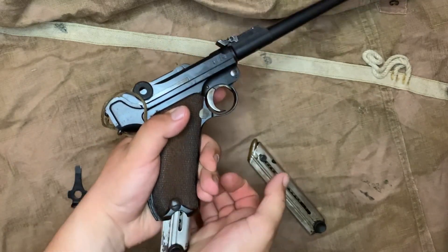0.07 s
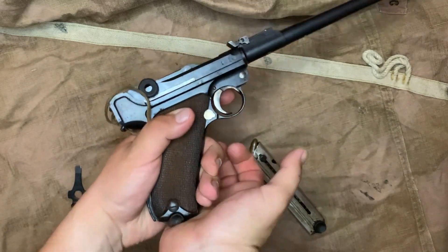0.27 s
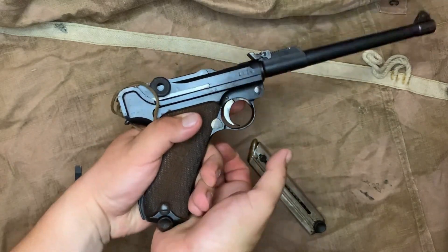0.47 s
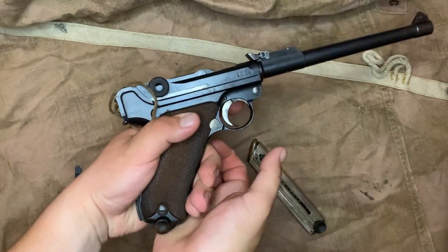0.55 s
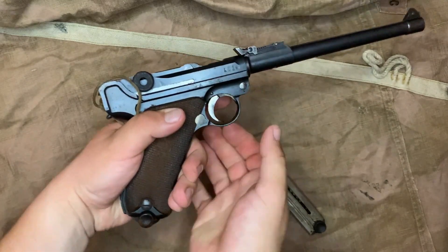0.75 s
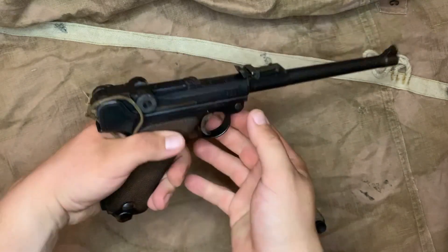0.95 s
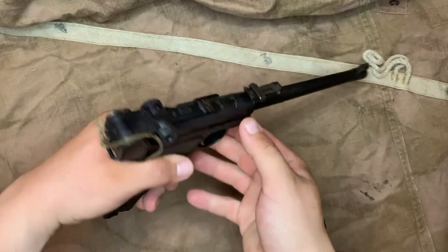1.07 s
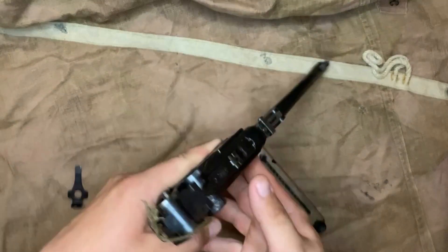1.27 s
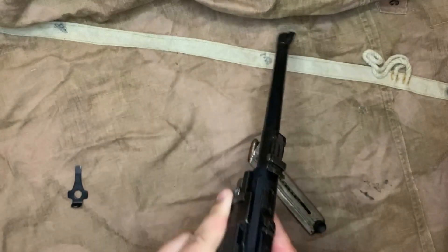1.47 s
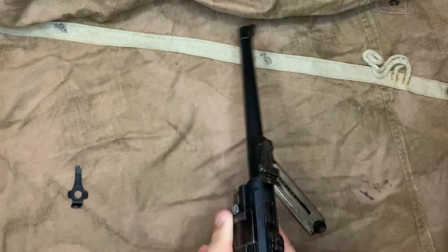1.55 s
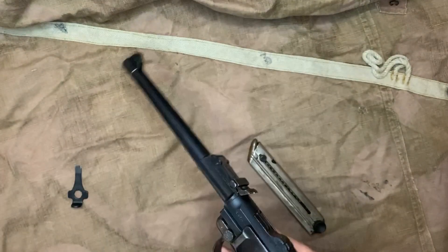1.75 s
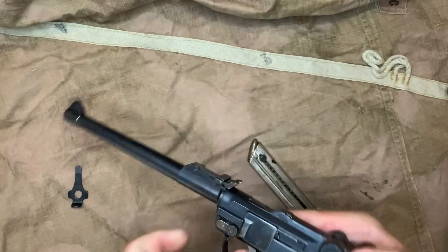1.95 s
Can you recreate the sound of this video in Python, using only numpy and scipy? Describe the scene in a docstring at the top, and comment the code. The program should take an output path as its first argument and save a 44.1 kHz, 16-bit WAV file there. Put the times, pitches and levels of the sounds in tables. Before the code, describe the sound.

A pistol magazine latches with a sharp metal clack, then a click and soft handling.

```python
"""Magazine into a pistol grip

A steel magazine scrapes up the grip and latches with a loud, ringing clack that overloads the microphone.
A catch clicks a moment later; the small room answers with two early echoes and a bright tail.
Then a thump booms through the floor, loose parts tick, the grip creaks in the hand and cloth rustles."""
import sys
import numpy as np
from scipy import signal
from scipy.fft import rfft, irfft
from scipy.io import wavfile
from scipy.ndimage import uniform_filter1d

SR = 44100
rng = np.random.default_rng(int(sys.argv[2]) if len(sys.argv) > 2 else 0)


def file_out(sig):
    """Save sig as 16-bit WAV at sys.argv[1]."""
    # one column per channel
    cols = np.atleast_2d(sig).T
    # limit, then scale
    lim = np.clip(cols, -1, 1)
    pcm = np.round(lim * 32767).astype(np.int16)
    wavfile.write(sys.argv[1], SR, pcm)


N = 88200

# Frame and magazine resonances: (pitch [Hz], base width [Hz], level [dB])
STEEL_MODES = [(972, 450, -11), (1450, 510, -6), (2426, 610, -8.5), (3070, 190, -3), (3890, 350, -8),
               (4680, 720, -8), (6020, 310, -2.5), (6335, 280, -2.5), (7718, 1200, -2.5),
               (8856, 1200, -6.5), (8987, 190, 1), (8940, 900, -6), (10450, 740, -6.5), (13180, 700, -18.5),
               (14960, 2600, -17)]
MODE_WIDENING, LOW_MODES_BELOW_HZ = 1 / .75, 3300
FOCUS_DB, FOCUS_OCTAVES = 7, .45
RELEASE_DB_PER_S, LOW_CUT_HZ = -6000, 680
PUFF_DB, PUFF_PEAK_S = -47, .0032
def steel_hit(level_db, attack_s, chatter_s, focus_hz, lows_db, contact_db):
    """A chatter of contacts rings the steel, most strongly near one pitch, over a low puff."""
    t = np.arange(1300) / SR
    envelope = np.minimum(t / attack_s, 1) * amp(RELEASE_DB_PER_S * np.maximum(t - chatter_s, 0))
    chatter = rng.standard_normal(len(t))
    for _ in range(2):  # even out the spectrum, then the level
        spectrum = rfft(chatter)
        chatter = irfft(spectrum / np.sqrt(uniform_filter1d(abs(spectrum) ** 2, 5) + 1e-20), len(t))
        chatter = envelope * chatter / np.sqrt(uniform_filter1d(chatter ** 2, 15) + 1e-12)
    chatter[round(attack_s * SR)] += amp(contact_db)
    ring = np.zeros(len(t))
    for k, (hz, width, db) in enumerate(STEEL_MODES):
        focus = FOCUS_DB * np.exp(-(np.log2(hz / focus_hz) / FOCUS_OCTAVES) ** 2)
        gain = amp(db + focus + lows_db * (hz < LOW_MODES_BELOW_HZ))
        ring += (-1) ** k * gain * resonate(chatter, hz, width * MODE_WIDENING)
    # the steel radiates little bass
    ring = signal.sosfilt(signal.butter(4, LOW_CUT_HZ, "high", fs=SR, output="sos"), ring)
    ring /= np.sqrt(2 * np.max(uniform_filter1d(ring ** 2, 40)))
    puff = amp(PUFF_DB) * t / PUFF_PEAK_S * np.exp(1 - t / PUFF_PEAK_S)
    return amp(level_db) * (ring + puff)


# Swell of the slide up the grip: (time [s], level [dB])
SCRAPE_ENVELOPE = [(.11, -79.5), (.135, -60.5), (.143, -54), (.15, -59), (.158, -46), (.165, -50.5),
                   (.185, -48.5), (.2, -53), (.206, -57.5)]
def scrape():
    """Sliding grit rings the steel, with the low modes pushed forward."""
    grit = rng.standard_normal(N) * amp(2.5 * rng.exponential(1, N)) * (rng.random(N) < .15)
    ring = sum(amp(db + 14 * (hz < LOW_MODES_BELOW_HZ)) * resonate(grit, hz, width * MODE_WIDENING)
               for hz, width, db in STEEL_MODES)
    return fader(SCRAPE_ENVELOPE) * unit_rms(ring)


# Steel on steel; the loudest is the latch, the last is the catch:
# (time [s], level [dB], attack [s], chatter length [s], focus [Hz], low modes [dB], first contact [dB])
STEEL_HITS = [(.1677, -23, .0008, .0015, 2950, 7, 0), (.1815, -39, .001, .005, 3000, 5, 0),
              (.203, -27, .004, .004, 8500, -12, -10), (.2069, -10, .0008, .0015, 7400, 7, 6),
              (.2119, -16, .0004, .0008, 7600, 6, 5), (.2199, 2, .0002, .0022, 6300, -1, 8),
              (.4697, -15, .0001, .002, 8600, 1, 24)]
def magazine():
    """Scrape and hits: the direct sound, and a room send averaged over all directions."""
    direct = scrape()
    send = direct.copy()
    for start, *settings in STEEL_HITS:
        hit = steel_hit(*settings)
        add(direct, start, hit)
        smooth_spectrum = np.sqrt(uniform_filter1d(abs(rfft(hit)) ** 2, 17))
        add(send, start, np.roll(irfft(smooth_spectrum), 60))
    return direct, send


# Boom of the floor: (pitch [Hz], level re THUMP_DB [dB], decay to -60 dB [s], attack [s])
FLOOR_MODES = [(43.27, 1.5, 1.11, 0.021), (58.4, -2.5, 0.77, 0.039), (77.1, -1, 0.83, 0.039),
               (129.4, 8.5, 0.05, 0.0022), (187.6, 5.5, 0.063, .002), (265, -13.5, 0.24, 0.006),
               (186, -22.5, 1.55, 0.012)]
# Rumble under the boom: (time [s], sub level [dB], bass level [dB])
RUMBLE_ENVELOPE = [(1.15, -109, -86), (1.282, -44, -44.5), (1.494, -48.5, -62), (1.556, -55.5, -55),
                   (1.666, -55, -64), (1.794, -54.5, -97), (1.84, -60, -78), (1.912, -62, -66),
                   (2.0, -53, -66)]
THUMP_S, THUMP_DB = 1.1935, -38
def floor_thump():
    """A knock blooms into slow floor modes and trails off in rumble."""
    boom, t = np.zeros(N), np.arange(SR) / SR
    for hz, db, t60, attack in FLOOR_MODES:
        envelope = amp(THUMP_DB + db - 60 * t / t60) * (1 - np.exp(-t / attack))
        add(boom, THUMP_S, envelope * np.sin(2 * np.pi * hz * t))
    sub = unit_rms(resonate_twice(rng.standard_normal(N), hz=15.6, width=7.9))
    bass = resonate(rng.standard_normal(N), hz=73.4, width=16)
    bass = unit_rms(resonate(bass, hz=74.67, width=16))
    return boom + fader(RUMBLE_ENVELOPE, column=1) * sub + fader(RUMBLE_ENVELOPE, column=2) * bass


# Small ticks of loose parts: (time [s], peak level [dB], pitch [Hz], width [Hz])
LOOSE_TICKS = [(1.03, -62, 1000, 799), (1.075, -56.5, 1200, 900), (1.075, -61.5, 2500, 1500),
               (1.158, -53, 2420, 1000), (1.158, -54.5, 1202, 899.3), (1.158, -55.5, 8496, 3000),
               (1.186, -52.5, 2230, 1200), (1.196, -55, 1570, 1200), (1.274, -52, 4000, 7000),
               (1.43, -50, 1300, 1200), (1.581, -55, 1289, 900), (1.825, -55, 6500, 2490)]
def loose_parts():
    """Each tick is a brief noise burst ringing one resonance."""
    out, t = np.zeros(N), np.arange(900) / SR
    for start, db, hz, width in LOOSE_TICKS:
        burst = rng.standard_normal(len(t)) * t * np.exp(-t / .0012)
        tick = resonate_twice(burst, hz, width)
        add(out, start, amp(db) * tick / abs(tick).max())
    return out


# Stutter of the creak: (time [s], level [dB])
CREAK_ENVELOPE = [(1.73, -77), (1.745, -62), (1.75, -48), (1.76, -45), (1.764, -54.5), (1.783, -43.5),
                  (1.792, -51.5), (1.804, -81), (1.818, -54.5), (1.827, -49.5), (1.835, -72), (1.842, -55),
                  (1.85, -72), (1.876, -67), (1.9, -91)]
# Woody body of the grip: (pitch [Hz], width [Hz], relative level [dB])
GRIP_MODES = [(975, 210, 19.5), (1067, 128, 20), (1147, 250, -31), (1850, 360, 1), (3574, 500, 1),
              (6965, 4500, 1)]
SLIPS_PER_S, SLIP_SPREAD_DB = 6000, 2.2
def grip_creak():
    """Dense, uneven slips of skin ring the wooden grip."""
    strength = amp(SLIP_SPREAD_DB * rng.exponential(1, N))
    slips = strength * (rng.random(N) < SLIPS_PER_S / SR) * rng.choice([-1, 1], N)
    wood = sum(amp(db) * resonate_twice(slips, hz, width) / np.sqrt(width)
               for hz, width, db in GRIP_MODES)
    return fader(CREAK_ENVELOPE) * unit_rms(wood)


# Early reflections: (delay [s], gain ahead of the treble tilt [dB])
EARLY_ECHOES = [(.0085, -19), (0.022, -20.5)]
# Length of the tail: (frequency [Hz], decay to -60 dB [s])
TAIL_DECAY = [(250, 0.37), (700, .6), (1400, 0.39), (2700, 0.43), (5400, 0.45), (8000, .38), (12000, 0.29),
              (15000, 0.23)]
# Colour of the tail: (frequency [Hz], relative level [dB])
TAIL_EQ = [(200, -12), (600, 0), (1600, 2), (3500, 2.5), (6000, -6.5), (12000, 5), (15500, 3)]
TAIL_DB, TAIL_ATTACK_S = -10.5, .0034
def room_reverb(direct, send):
    """Two thin early echoes, then a dense tail whose bands die at their own speed."""
    hz, t, noise = signal.stft(rng.standard_normal(SR), SR, nperseg=256)
    band_db = at_hz(TAIL_EQ, hz)[:, None] - 60 * t / at_hz(TAIL_DECAY, hz)[:, None]
    tail = signal.istft(noise * amp(band_db), SR, nperseg=256)[1]
    tail *= 1 - np.exp(-(np.arange(len(tail)) / SR / TAIL_ATTACK_S) ** 2)
    wet = signal.fftconvolve(send, amp(TAIL_DB) * tail / np.linalg.norm(tail))[:N]
    for delay, db in EARLY_ECHOES:
        add(wet, delay, amp(db) * np.diff(direct))  # diff tilts toward the treble
    return wet


# Movement of cloth and skin: (time [s], level [dB])
RUSTLE_ENVELOPE = [(0, -60), (.1, -67), (.6, -78), (.75, -70.5), (.9, -70.5), (1.05, -72.5), (1.2, -75.5),
                   (1.24, -66), (1.28, -65.5), (1.36, -74.5), (1.43, -69.5), (1.48, -70), (1.57, -65),
                   (1.65, -67), (1.8, -66), (2, -70.5)]
# Colour of the cloth: (frequency [Hz], relative level [dB])
CLOTH_EQ = [(150, -19), (400, 5.5), (1000, -5), (2500, -6), (4500, -19.5), (9000, -16.5), (14000, -25)]
def cloth_rustle():
    """Cloth and skin brush in soft swells of noise."""
    return fader(RUSTLE_ENVELOPE) * coloured_noise(CLOTH_EQ, drift_db=.5)


# Colour of the background hiss: (frequency [Hz], relative level [dB])
HISS_EQ = [(12, -32.5), (20, 0.5), (65, -3.5), (268, -15.5), (364, -13), (455, -32), (537, -14.5),
           (672, -27), (1210, -26.5), (15700, -35)]
# How far the hiss differs between left and right: (frequency [Hz], side gain [dB])
HISS_SIDE_EQ = [(1300, -32.5), (2400, -26.5), (4400, -9), (8100, -7), (15000, -3)]
HISS_DB, WHINE_HZ, WHINE_DB = -64.5, 995, -78.5
def background_hiss():
    """Faint background hiss whose treble differs slightly between left and right, and a thin whine."""
    whine = amp(WHINE_DB) * np.sin(2 * np.pi * WHINE_HZ * np.arange(N) / SR)
    side_gain = amp(at_hz(HISS_SIDE_EQ, np.fft.rfftfreq(N, 1 / SR)))
    side = irfft(rfft(coloured_noise(HISS_EQ, drift_db=-.26)) * side_gain, N)
    mid = coloured_noise(HISS_EQ, drift_db=.34)
    return amp(HISS_DB) * np.array([mid + side, mid - side]) + whine


def coloured_noise(eq, drift_db):
    """Noise shaped by an EQ curve, with drifting patches of level."""
    hz = np.fft.rfftfreq(1024, 1 / SR)
    real, imag, drift = rng.standard_normal((N // 256 + 5, 513, 3)).T
    drift = unit_rms(uniform_filter1d(uniform_filter1d(drift, 12, axis=0), 10, axis=1))
    spectrum = (real + 1j * imag) * amp(at_hz(eq, hz)[:, None] + drift_db * drift)
    return unit_rms(signal.istft(spectrum, nperseg=1024, noverlap=768)[1][:N])


def amp(db):
    return 10 ** (np.asarray(db) / 20)


def unit_rms(x):
    return x / np.sqrt(np.mean(x ** 2) + 1e-20)


def at_hz(table, hz):
    frequencies, values = np.transpose(table)
    return np.interp(np.log(hz + 1), np.log(frequencies + 1), values)


def fader(table, column=1):
    """A level table over time as gain, silent outside its span."""
    rows = np.array(table)
    return amp(np.interp(np.arange(N) / SR, rows[:, 0], rows[:, column], -150, -150))


def add(mix, start_s, sound):
    part = mix[round(start_s * SR):][:len(sound)]
    part += sound[:len(part)]


def resonate(x, hz, width):
    """A two-pole resonance with unity gain at its peak."""
    return signal.lfilter(*signal.iirpeak(min(hz, .45 * SR), hz / width, SR), x)


def resonate_twice(x, hz, width):
    return resonate(resonate(x, hz, width), hz, width)


def scene():
    """Steel and handling feed the reverb; thump, hiss and cloth sit underneath."""
    steel, steel_send = magazine()
    handling = loose_parts() + grip_creak()
    reverb = room_reverb(steel + handling, steel_send + handling)
    return steel + handling + reverb + floor_thump() + background_hiss() + cloth_rustle()


HIGH_CUT_HZ = 15750
def record(dry):
    """The converter clips the latch, then a steep high cut trims the top."""
    clipped = np.clip(dry, -1, 1)
    high_cut = signal.firwin(511, HIGH_CUT_HZ, window=("kaiser", 9), fs=SR)
    return np.clip(signal.oaconvolve(clipped, high_cut[None], "same"), -1, 1)


dry = scene()
out = record(dry)
file_out(out)
```